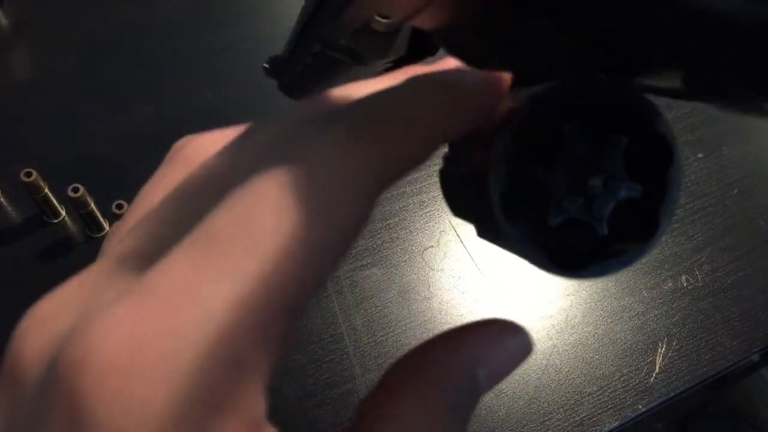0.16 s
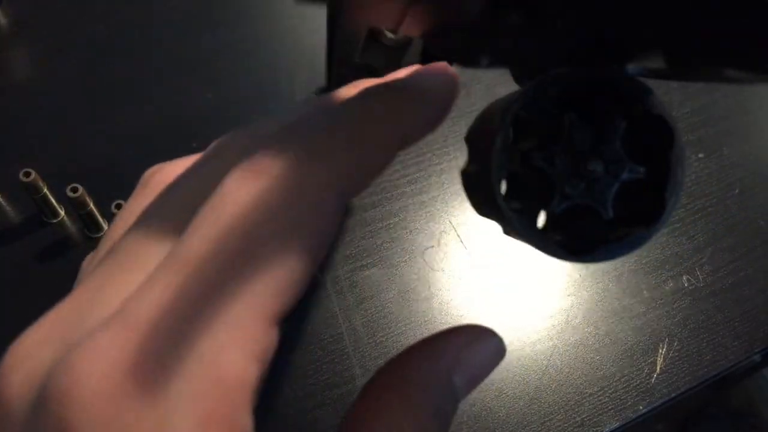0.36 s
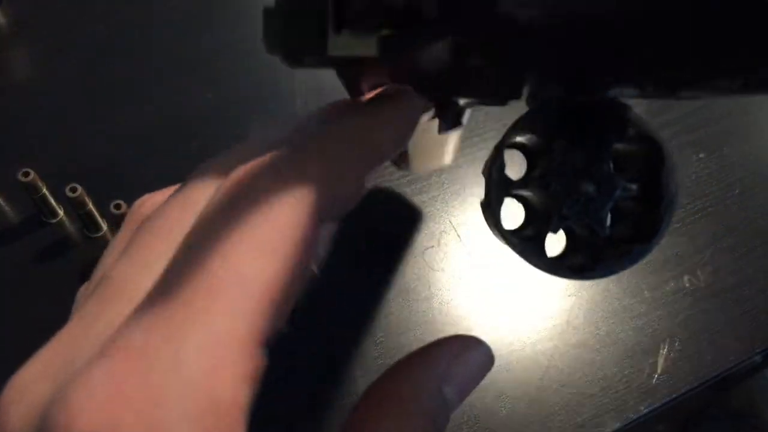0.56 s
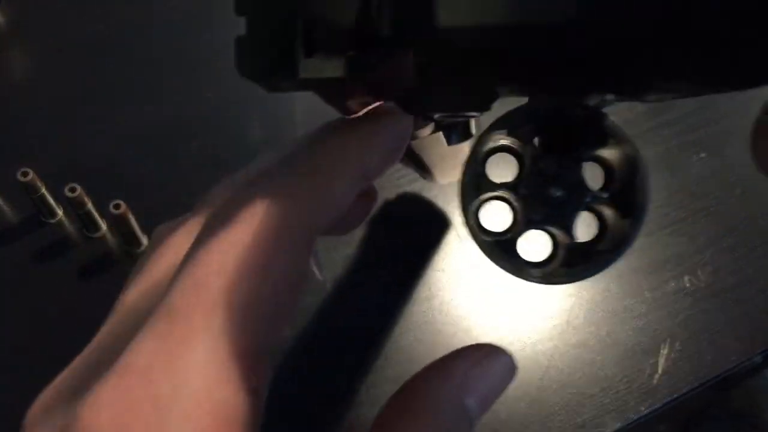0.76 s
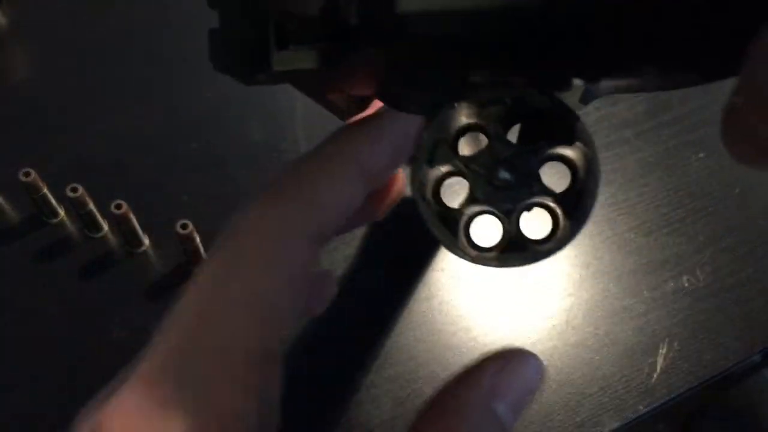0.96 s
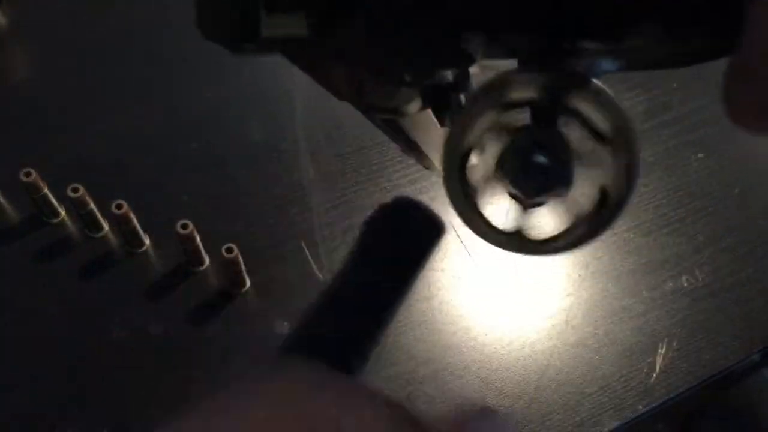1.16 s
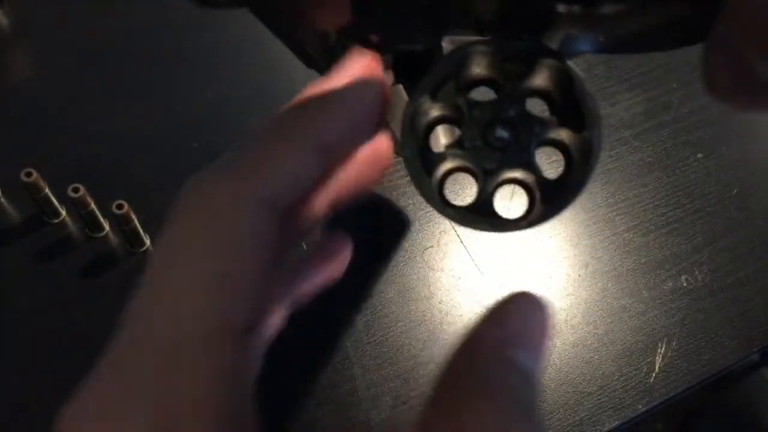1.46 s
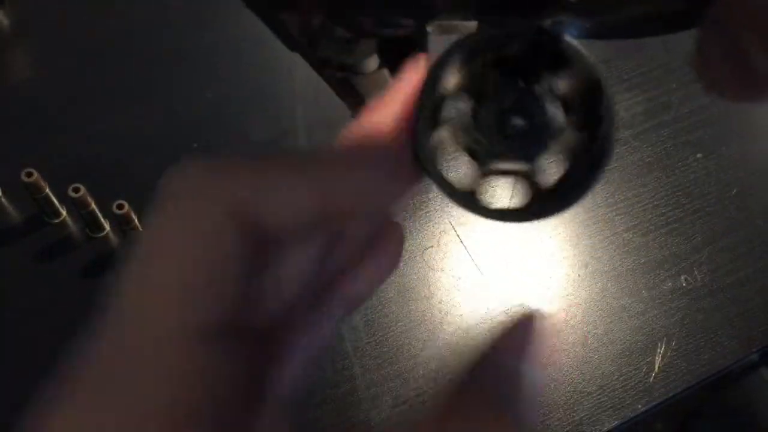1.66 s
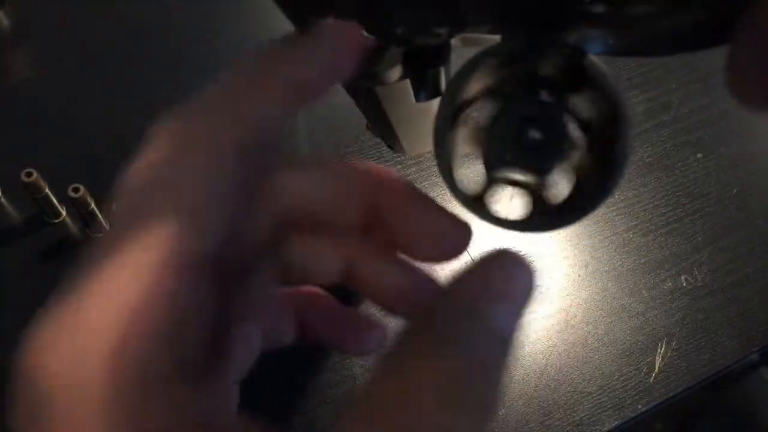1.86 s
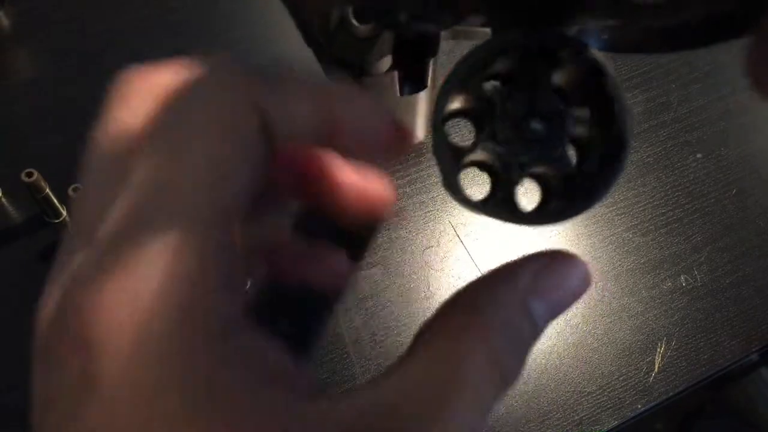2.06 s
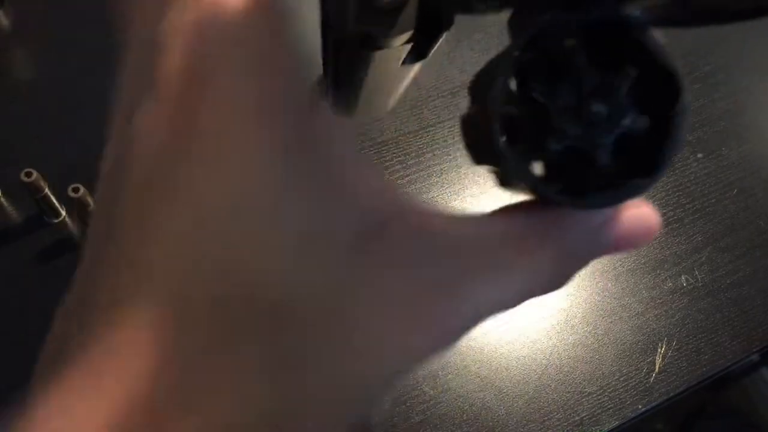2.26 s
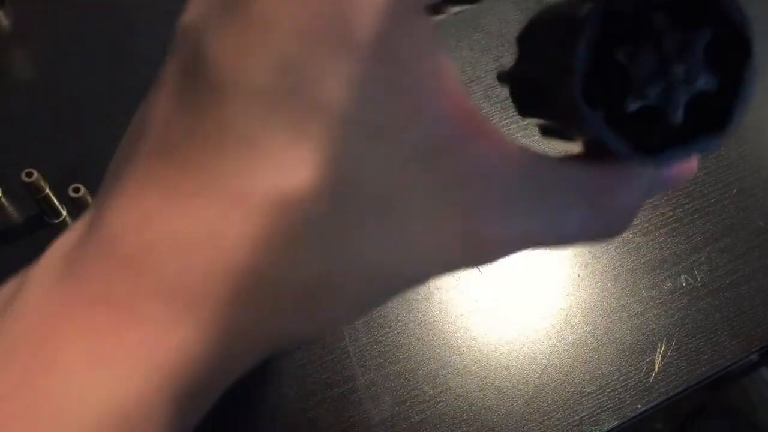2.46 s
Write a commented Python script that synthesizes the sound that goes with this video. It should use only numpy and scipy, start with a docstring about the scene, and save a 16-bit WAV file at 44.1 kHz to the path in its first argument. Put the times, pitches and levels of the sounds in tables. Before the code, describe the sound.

Sharp metallic clicks of a toy revolver, close to the microphone in a small quiet room with faint wavering hum. Near-quiet until a dull, hollow knock at 0.85 s; a bright, weighty cluster of clacks at 1.15 s; a softer, duller clack at 1.65 s; faint ticks and a light click around 2.0 s, more tiny ticks to 2.3 s; then the loudest, ringing snap shut at 2.6 s, with brief echo.

```python
"""A faint, wavering hum and soft room noise lie under the whole scene: a small, quiet room.
Just above a table, close to the microphone, a toy revolver's cylinder is swung out, flicked round twice
and, at about 2.6 s, snapped shut with the loudest clicks; a dull, hollow knock comes early, near 0.85 s.
Each click is a cluster of contacts: coloured noise bursts that ring the frame, loose cylinder and thin steel
as decaying sines. Low sines add thumps, and a wall echo with a short diffuse tail adds the room."""
import sys
import numpy as np
from scipy import signal
from scipy.fft import rfft, irfft
from scipy.io import wavfile
from scipy.ndimage import uniform_filter1d, minimum_filter1d

SR = 44100
rng = np.random.default_rng(int(sys.argv[2]) if len(sys.argv) > 2 else 0)


def unload_wav(signal):
    """Save mono or channel-first audio to the path in sys.argv[1] as 16-bit WAV at rate SR, clipped to [-1, 1]."""
    wavfile.write(
        sys.argv[1],
        SR,
        np.round(np.clip(np.atleast_2d(signal).T, -1, 1) * 32767).astype(np.int16),
    )


N = 114660  # samples, 2.6 s

# Soft room noise, relative density: pitch_hz, level_db (per Hz)
AIR_TONE = [(15, -48.5), (25, -27.5), (53, -2.5), (73, -3), (93, -6), (129, -8), (260, -9), (289, -1.5),
            (322, -11), (457, -16), (804, -17), (970, -20.5), (1300, -20), (13900, -32), (15500, -38)]
AIR_DB = -67.5  # rms
# Steady hum partials: pitch_hz, level_db (rms)
HUM_PARTIALS = [(60, -78.5), (129, -80.5), (294, -75), (705, -94), (969, -86)]
HUM_WAVER, HUM_WAVER_HZ = 0.29, 3  # rms depth against the sine, fastest wander

# Tone of the room's echo: pitch_hz, gain_db
ROOM_TONE = [(60, -15.5), (300, -8.5), (700, -6), (1030, 0), (1200, -7), (1430, -2), (1800, -2.5),
             (2600, -1.5), (4300, -1), (8000, -2.5), (12000, -2), (15000, -10.5)]
TAIL_DB, TAIL_T60_S, TAIL_TREBLE_T60_S = -14.5, 0.34, 0.26  # level is ahead of ROOM_TONE
TAIL_DELAY_S, TAIL_BUILD_S = 0.0027, 0.004
WALL_DB, WALL_S, WALL_SPREAD_S = -25.5, 0.023, 0.005  # level is ahead of ROOM_TONE

# Thumps of the gun's weight: start_s, level_db, pitch_hz, t60_s
THUMPS = [(0.845, -62, 109, 0.087), (1.154, -37, 71, 0.14), (1.168, -31.5, 125, 0.044),
          (1.647, -36.5, 130, 0.056), (1.657, -47.5, 74.1, .09), (2.011, -46, 140, 0.04)]
# A hollow part set ringing by a dull knock: pitch_hz, level_db, t60_s
HOLLOW_MODES = [(659, -54, 0.084), (725, -48.5, 0.126), (780, -49.5, 0.14)]
KNOCK_S = 0.846

# Ringing of the frame, relative levels: pitch_hz, level_db, t60_s
FRAME_MODES = [(1055, -2.5, 0.046), (1420, -13, 0.044), (2204, -8, 0.047), (2760, -9.5, 0.026),
               (3210, -7, 0.034), (4070, -8.5, 0.049), (6240, -1, 0.019), (7050, -7.5, 0.024),
               (8300, -12.5, 0.026), (9001, -14.5, 0.026), (9464, -6, 0.043)]
# Blurred after-ring of the loose cylinder, relative levels: pitch_hz, level_db, t60_s
LOOSE_MODES = [(996, -26.5, 0.49), (1494, -26, 0.46), (2764, -27, 0.4)]
LOOSE_WIDTH_HZ = 79  # fastest flutter
# Pitches of the thin steel part: pitch_hz
STEEL_HZ = (11785, 11835, 14880)
# Ring of each steel pitch, relative levels: level_db, t60_s
STEEL_RING = [(1, 0.11), (-8, 0.14), (-16, .18)]

# Hard contacts: start_s, six relative level_db (one at each COLOUR_HZ), resonance_hz, decay_ms,
# ring_db (frame and cylinder), ping_db (steel)
CONTACTS = [ (0.7539, -48, -57, -28, -19, -32, -32, 1720, 2.7, -80, -84),
            (0.8409, -47, -46, -23.5, -19, -46, -39, 1910, 1.9, -58.5, -83),
            (0.8430, -4.5, -2, -1.5, -23, -38, -43, 690, 1.7, -84, -88),
            (1.1479, 0.5, 5.5, -3, 8, 12.5, 0, 5070, 1.47, -34.5, -42),
            (1.1508, 9.5, 3.5, 9.5, 5.5, -0.5, -13, 1380, 3, -30.5, -24),
            (1.1674, -5, -10, -2, -3, -1, -16, 1140, 4.2, -62, -61),
            (1.1695, -1.5, -27, 2, -1.5, 1, 2, 6940, 1.3, -48, -50),
            (1.1738, -17.5, -5, 5.5, -4.5, -5, -13, 2800, 12, -33.5, -48),
            (1.612, -36, -24, -30.5, -39.5, -46.5, -52, 1100, 18.5, -81.5, -79.5),
            (1.6431, -7, -18, -2.5, -3.5, -0.5, -20.5, 3070, 2.4, -49, -59.5),
            (1.6479, -8.5, -5, 1.5, -0.5, -11.5, -37, 785, 2.85, -57, -54),
            (1.6545, -14, -12.5, -9, -19, -18, -28.5, 1150, 3.1, -58, -70.5),
            (1.7280, -62, -53, -44, -51, -44, -36, 11800, 11, -88, -69),
            (1.8452, -45, -33, -32.5, -28, -45, -47, 2560, 3.0, -83, -90),
            (1.862, -29, -25, -27, -32, -45.5, -53, 887, 5.0, -76.5, -92.5),
            (1.9156, -44.5, -27.5, -34, -35, -43, -53, 2400, 3, -78.5, -90.5),
            (1.9980, -50, -16, -11.5, -11.5, -16.5, -42, 2517, 1.6, -64.5, -80),
            (2.008, -23, -9, -6.5, -10.5, -26.5, -37.5, 1150, 3.1, -65, -83.5),
            (2.1385, -39, -27.5, -25, -22.5, -42.5, -41, 2606, 3.1, -73.5, -86.5),
            (2.2738, -46, -35.5, -17.5, -17.5, -29.5, -37, 1350, 2.5, -62, -90),
            (2.3274, -48, -44, -27.5, -26, -42.5, -50, 2650, 2.4, -76, -89.5),
            (2.5835, -14, 3, 8.5, 6, 17, 15.5, 5520, 3, -26.5, -36),
            (2.5858, -13.5, -4.5, 13.5, 23.5, 13, 11.5, 2027, 1.56, -24, -30),
            (2.5885, -18.5, -0.5, 13.5, 3.5, 8, 1, 1050, 4.7, -29, -15)]
# Pitches at which a contact's colour is set: pitch_hz
COLOUR_HZ = (200, 550, 1200, 2500, 5000, 11000)
# Tone shared by all contacts: pitch_hz, gain_db
GUN_TONE = [(40, -25), (150, 4), (330, 0.5), (560, 1), (770, 1.5), (900, -2), (1100, -1), (1420, 3.5),
            (1800, -0.5), (2700, 2.5), (3700, -2), (4500, 2), (5100, -3), (5600, 2), (7400, 0.5), (9300, 0),
            (10400, -7), (11700, -0.5), (15000, -6.5)]
CRACK_SHARE, RATTLE_ATTACK_MS = 0.22, 0.2  # first impact against a rattle of unit energy; rattle build-up
EVEN_HZ = 409.6  # width over which the rattle's spectrum is evened out
RESONANCE_DB, RESONANCE_WIDTH_HZ = 7, 190  # lift and half-width of a contact's main resonance

CEILING, LIMITER_S = 0.92, 0.001  # limiter's peak amplitude and window
TOP_HZ = 15250


def undb(db):
    """Decibels to amplitude."""
    return 10 ** (np.asarray(db) / 20)


def unit(x):
    """Scale to an rms of one."""
    return x / np.sqrt(np.mean(x ** 2))


def bin_hz(size):
    """Frequency of every bin of a transform."""
    return np.arange(size // 2 + 1) * SR / size


def gains(points, size):
    """Gain at every bin, drawn through (pitch_hz, gain_db) points on a log pitch scale."""
    hz, db = np.array(points, float).T
    f = np.maximum(bin_hz(size), 1)
    return undb(np.interp(np.log(f), np.log(hz), db))


def colour(x, gain):
    """Minimum-phase filter: it has the given gain at each bin and nothing sounds ahead of its cause."""
    cepstrum = irfft(np.log(gain))
    # fold the cepstrum onto positive time
    cepstrum[1:len(x) // 2] *= 2
    cepstrum[len(x) // 2 + 1:] = 0
    return irfft(rfft(x) * np.exp(rfft(cepstrum)))


def add(out, start_s, x):
    """Mix x in from the given time on."""
    i = int(start_s * SR)
    out[i:i + len(x)] += x[:max(len(out) - i, 0)]


def fade(t, t60_s):
    """Exponential decay that falls 60 dB in t60_s."""
    return np.exp(-np.log(1000) * t / t60_s)


def ring(modes, size=16384):
    """Struck solid: a sum of decaying sines, one for each (pitch_hz, level_db, t60_s)."""
    t = np.arange(size) / SR
    return sum(undb(db) * np.sin(2 * np.pi * hz * t) * fade(t, t60_s) for hz, db, t60_s in modes)


def slow_noise(top_hz, size):
    """Low-passed noise of unit rms, a random wander."""
    slow = signal.butter(2, top_hz, fs=SR, output="sos")
    return unit(signal.sosfilt(slow, rng.standard_normal(size)))


def room_noise():
    """Soft, steady room noise: white noise shaped in the spectrum."""
    spectrum = rfft(rng.standard_normal(N)) * gains(AIR_TONE, N)
    return undb(AIR_DB) * unit(irfft(spectrum, N))


def hum():
    """Faint low partials whose strength and phase wander through slow noise on sine and cosine."""
    t = np.arange(N) / SR
    out = np.zeros(N)
    for hz, db in HUM_PARTIALS:
        in_phase = 1 + HUM_WAVER * slow_noise(HUM_WAVER_HZ, N)
        quadrature = HUM_WAVER * slow_noise(HUM_WAVER_HZ, N)
        phase = 2 * np.pi * hz * t
        out += undb(db) * unit(in_phase * np.sin(phase) + quadrature * np.cos(phase))
    return out


def room(x, size=32768):
    """Scattered echo off a near wall and a diffuse tail whose treble dies a little sooner."""
    t = np.arange(size) / SR
    noise = rng.standard_normal(size)
    low = signal.sosfiltfilt(signal.butter(2, 3500, fs=SR, output="sos"), noise)
    treble = noise - low
    late = np.maximum(t - TAIL_DELAY_S, 0)
    tail = low * fade(late, TAIL_T60_S) + treble * fade(late, TAIL_TREBLE_T60_S)
    tail = tail * (1 - np.exp(-late / TAIL_BUILD_S))
    # another stretch of the same noise, so that wall and tail differ
    wall = np.roll(low, size // 2) * np.exp(-0.5 * ((t - WALL_S) / WALL_SPREAD_S) ** 2)
    echo = undb(TAIL_DB) * tail / np.linalg.norm(tail)
    echo = echo + undb(WALL_DB) * wall / np.linalg.norm(wall)
    return signal.fftconvolve(x, colour(echo, gains(ROOM_TONE, size)))[:N]


def thumps():
    """The gun's weight: low decaying sines under the heavier contacts."""
    out = np.zeros(N)
    for start_s, db, hz, t60_s in THUMPS:
        add(out, start_s, ring([(hz, db, t60_s)]))
    return out


def hollow_knock():
    """A dull knock sets a hollow part ringing in a few close modes."""
    out = np.zeros(N)
    add(out, KNOCK_S, ring(HOLLOW_MODES))
    return out


def steel_ping():
    """A thin steel part rings in a few very high modes."""
    return ring([(hz, db, t60_s) for hz, (db, t60_s) in zip(STEEL_HZ, STEEL_RING)])


def loose_ring(size=16384):
    """The cylinder has play on its pin, so noise makes each mode of its ringing flutter."""
    return sum(ring([mode], size) * slow_noise(LOOSE_WIDTH_HZ, size) for mode in LOOSE_MODES)


def contact(levels_db, resonance_hz, decay_ms, size=4096):
    """A hard impact, then a brief rattle, coloured by the parts that meet and their main resonance."""
    ms = np.arange(size) * 1000 / SR
    rattle = rng.standard_normal(size) * np.exp(-ms / decay_ms)
    rattle = rattle * (1 - np.exp(-ms / RATTLE_ATTACK_MS))
    burst = rattle / np.linalg.norm(rattle)
    burst[0] += CRACK_SHARE
    # flatten the burst's broad spectrum so that the tone below sets the colour
    even_bins = max(int(EVEN_HZ * size / SR), 1)
    spread = np.sqrt(uniform_filter1d(abs(rfft(burst)) ** 2, even_bins))
    detune = (bin_hz(size) - resonance_hz) / RESONANCE_WIDTH_HZ
    resonance = undb(RESONANCE_DB / (1 + detune ** 2))
    tone = gains(list(zip(COLOUR_HZ, levels_db)), size) * gains(GUN_TONE, size) * resonance
    return colour(burst, tone / spread)


def revolver():
    """Every contact cracks and rings frame, cylinder and steel; thumps and the hollow knock join in."""
    out = thumps() + hollow_knock()
    frame = ring(FRAME_MODES)
    steel = steel_ping()
    for start_s, *levels_db, resonance_hz, decay_ms, ring_db, ping_db in CONTACTS:
        add(out, start_s, contact(levels_db, resonance_hz, decay_ms))
        add(out, start_s, undb(ring_db) * (frame + loose_ring()))
        add(out, start_s, undb(ping_db) * steel)
    return out


def scene():
    """The gun close by, its echo, and the room's noise and hum."""
    gun = revolver()
    return (room_noise() + hum() + room(gun) + gun)[None]


def record(dry):
    """The recorder's limiter holds down peaks above the ceiling, then a steep low-pass cuts the top."""
    width = int(LIMITER_S * SR)
    needed = CEILING / np.maximum(abs(dry), CEILING)
    gain = uniform_filter1d(minimum_filter1d(needed, width), width)
    top_cut = signal.ellip(8, 0.2, 70, TOP_HZ, fs=SR, output="sos")
    return signal.sosfilt(top_cut, dry * gain)


dry = scene()
out = record(dry)
unload_wav(out)
```